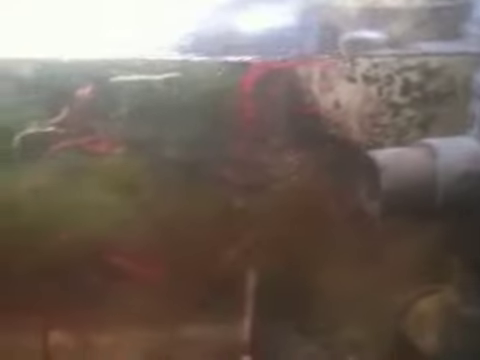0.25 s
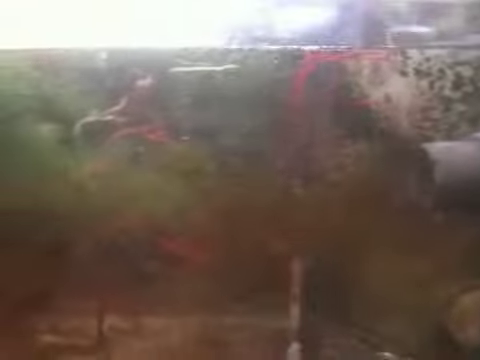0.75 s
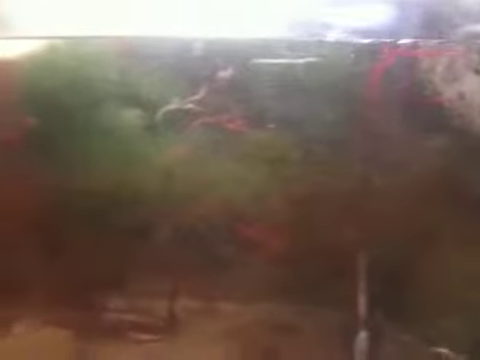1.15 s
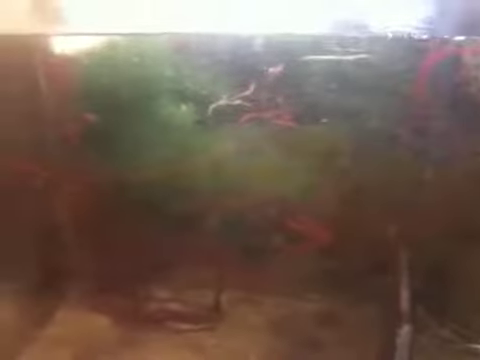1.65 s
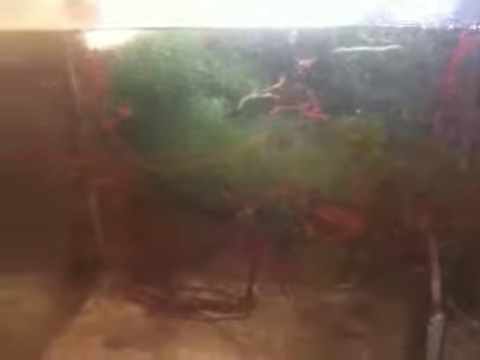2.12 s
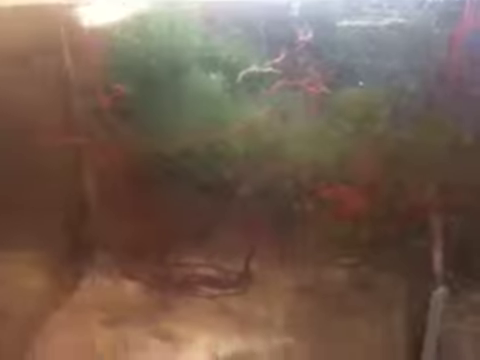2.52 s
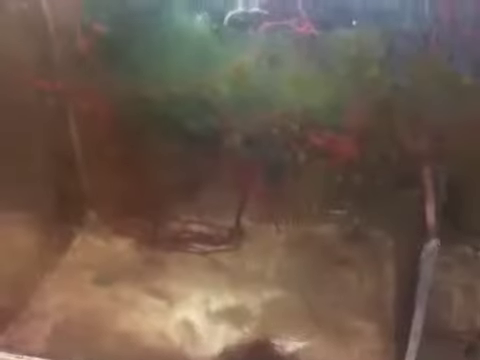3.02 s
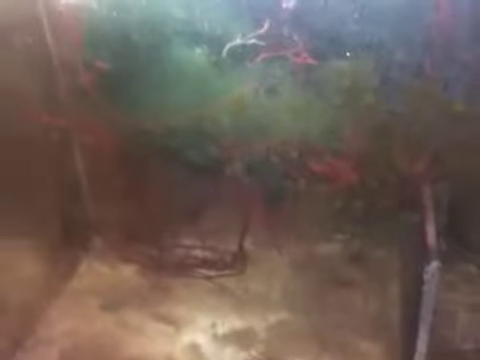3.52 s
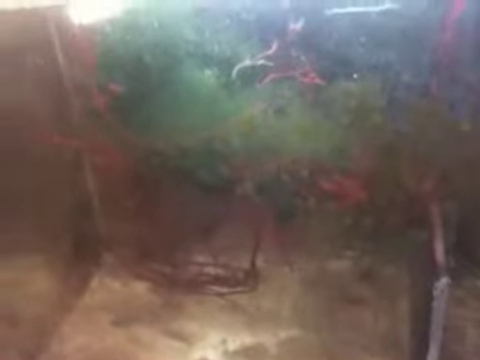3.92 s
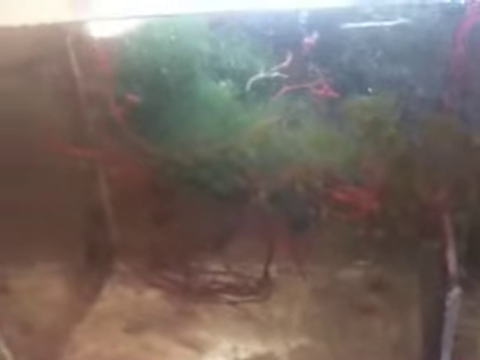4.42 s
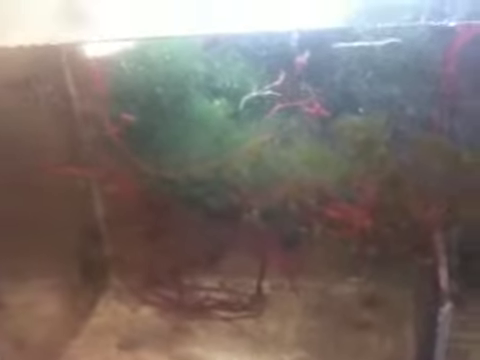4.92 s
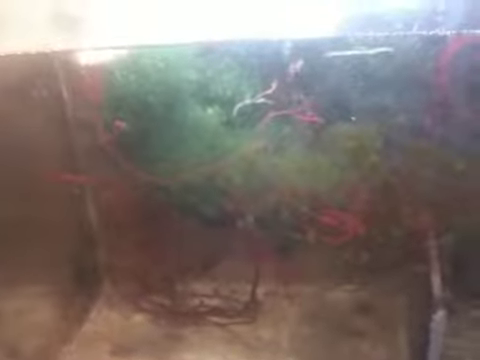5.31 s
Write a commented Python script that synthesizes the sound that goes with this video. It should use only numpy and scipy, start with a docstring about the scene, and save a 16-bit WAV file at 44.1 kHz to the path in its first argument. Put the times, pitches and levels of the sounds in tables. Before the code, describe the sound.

Inside the cabinet under an aquarium, water runs steadily down a drain pipe into the sump, with a hollow, resonant churn. An electric pump hums low beneath it throughout. Small bubbles gurgle, air gulps softly in the pipe and tiny droplets spit at irregular moments. The close microphone starts beside the pipe and shifts to the front of the sump after about a second, slightly changing the water's tone.

```python
"""Aquarium sump, close up

Inside the cabinet under a tank, a mains-driven pump hums while water runs down a drain pipe into
the sump. The flow rings the pipe and the cabinet, air gulps, bubbles gurgle and droplets spit, all
blurred by the close walls. The microphone starts beside the pipe and, after about a second, moves
toward the front of the sump."""
import sys
import numpy as np
from scipy import signal
from scipy.fft import rfft, irfft
from scipy.io import wavfile

SR = 44100
rng = np.random.default_rng(int(sys.argv[2]) if len(sys.argv) > 2 else 0)


def store_pcm(level_fs):
    """Save levels as 16-bit WAV."""
    pcm = np.round(np.clip(level_fs, -1, 1) * 32767).astype(np.int16)
    wavfile.write(sys.argv[1], SR, np.atleast_2d(pcm).T)


N = 244736
TIME = np.arange(N) / SR
BIN_HZ = np.maximum(np.fft.rfftfreq(N, 1 / SR), 1)
MAINS_HZ = 60.022

# Microphone path: time_s, position (0 beside the pipe, 1 in front of the sump)
MIC_PATH = [(0, 0.088), (1.05, 0.17), (1.55, 0.77), (5.55, 0.68)]
# Levels in the tables are relative: each source applies its own gain afterwards.
# Partials of the pump hum: mains_multiple, level_db
HUM_PARTIALS = [(2, -50.5), (3, -38), (4, -64.5), (5, -59.5), (6, -69.5), (8, -58), (10, -70), (12, -71),
                (15, -70.5), (17, -74.5), (18, -70.5), (20, -80)]
# Low gulps of air in the drain pipe: time_s, level_db
AIR_GULPS = [(.767, -53), (1.097, -56), (1.569, -53), (2.407, -49), (2.632, -51), (3.358, -55),
             (3.805, -50), (4.537, -50), (5.178, -49)]
# The loudest droplets: start_s, pitch_hz, ring_db, spit_db
LOUD_DROPLETS = [(0.572, 5900, -53, -41), (1.08, 9700, -59.5, -50), (1.332, 8500, -61, -57),
                 (1.448, 7460, -55, -69), (1.576, 7000, -57.5, -50), (2.06, 8200, -57.5, -62),
                 (2.341, 13000, -61, -51), (3.167, 9650, -62, -53), (3.423, 6700, -58, -59),
                 (3.832, 13000, -67, -50), (3.899, 6300, -54.5, -51), (4.225, 7000, -61, -51),
                 (4.536, 5130, -57.5, -48), (4.883, 5200, -57.5, -48), (5.13, 9400, -57, -59)]
# The loudest bubbles: start_s, pitch_hz, level_db
LOUD_BUBBLES = [(0.291, 4350, -55.5), (0.393, 3100, -55.5), (0.531, 2580, -54.5), (0.531, 1574, -50.5),
                (.567, 610, -48), (0.82, 3190, -55.5), (0.825, 1620, -52), (1.035, 1420, -49.5),
                (1.134, 1350, -54), (1.219, 3080, -56.5), (1.329, 4400, -57.5), (1.574, 2720, -57.5),
                (1.679, 1550, -48), (2.162, 3220, -56), (2.448, 4390, -57.5), (2.671, 1480, -49),
                (2.818, 1560, -52), (2.888, 1554, -52), (3.126, 1540, -51), (3.181, 1543, -52),
                (3.776, 1530, -51.5), (4.215, 3370, -55), (5.049, 3080, -54.5), (5.205, 2200, -52),
                (5.386, 2800, -53)]
# Colour of the running water: frequency_hz, gain_db
FLOW_COLOUR = [(25, -32), (60, -29), (90, -20), (135, -1), (190, 3.5), (235, -12.5), (560, -5),
               (820, -14.5), (1300, -15.5), (2100, -19.5), (4000, -25.5), (7500, -24.5), (11000, -33),
               (16000, -32)]
# Resonances of pipe and cabinet: centre_hz, width_hz, lift_at_pipe_db, lift_at_sump_db
RESONANCES = [(285, 80, 13.5, 12.5), (365, 29, -6, -5), (424, 82, 4, 4), (693, 36, 6.5, 0),
              (1035, 122, 9, 9), (1163, 18, 10, 5.5), (1336, 106, 5.5, 2.5), (1519, 60, -0.5, 10.5),
              (1610, 36, 10.5, 6.5), (2243, 20, 9.5, 5.5), (2454, 41, 8.5, 3.5), (2747, 180, 8.5, 6),
              (3020, 220, 4.5, -1.5), (3240, 43, 9, 7), (3810, 43, 6, 9.5), (4280, 110, 3.5, 3),
              (4920, 590, 3.5, 2), (6460, 310, 2, 2.5), (7040, 390, 5, 3.5)]


def undb(db):
    """Decibels to gain."""
    return 10 ** (np.asarray(db) / 20)


def unit_rms(x):
    """Scale to rms 1."""
    return x / np.sqrt(np.mean(x ** 2))


def noise(response):
    """White noise shaped by one gain per frequency bin."""
    return irfft(rfft(rng.standard_normal(N)) * response, N)


def wander(rate_hz):
    """Smooth random drift of rms 1, mostly slower than rate_hz."""
    return unit_rms(noise(np.exp(-(BIN_HZ / rate_hz) ** 2)))


def add(out, start_s, sound):
    """Mix a sound into out at start_s."""
    i = min(max(int(start_s * SR), 0), N)
    out[i:i + len(sound)] += sound[:N - i]


def scattered(low_hz, high_hz, db, spread_db, count):
    """Small events at loose intervals, as rows of start_s, pitch_hz, level_db."""
    when, pitch, strength = rng.random((count, 3)).T
    start_s = (np.arange(count) + when) * N / SR / count
    pitch_hz = low_hz * (high_hz / low_hz) ** pitch
    return list(zip(start_s, pitch_hz, db + spread_db * (2 * strength - 1)))


def mic_position():
    """Where the microphone is at each sample, between pipe (0) and sump (1)."""
    return np.interp(TIME, *np.transpose(MIC_PATH))


def wall_echoes(t60_s, build_s=0.0032, samples=5000):
    """Dense echoes between close glass and cabinet walls build up quickly and die away."""
    t = TIME[:samples]
    return rng.standard_normal(samples) * (1 - np.exp(-t / build_s)) * undb(-60 * t / t60_s)


def standing_waves(echo_db=-7.5, t60_s=0.22, corner_hz=1400):
    """Direct sound plus wall echoes at one spot: fine peaks and notches, mostly in the treble."""
    echoes = wall_echoes(t60_s)
    reflected = rfft(echoes / np.linalg.norm(echoes), N)
    response = 1 + undb(echo_db) * reflected * BIN_HZ / np.hypot(BIN_HZ, corner_hz)
    return response / np.sqrt(np.mean(np.abs(response) ** 2))


def pump_hum():
    """Mains-locked hum; the upper partials waver with the load on the impeller."""
    phase = 2 * np.pi * MAINS_HZ * TIME + 0.004 * wander(10)
    hum = 0
    for multiple, db in HUM_PARTIALS:
        waver_db = 0.055 * multiple * wander(6.6)
        hum += undb(db + waver_db) * np.cos(multiple * phase)
    return hum * undb(0.9 * (1 + mic_position()))  # a touch louder toward the sump


def gulps(pipe_hz=292, gain_db=3, swell_s=0.013, lead_s=0.007):
    """Swallowed air briefly swells the lowest resonance of the drain pipe."""
    out, t = np.zeros(N), TIME[:8000]
    swell = (t / swell_s) ** 2 * np.exp(2 * (1 - t / swell_s))
    for time_s, db in AIR_GULPS:
        detune, phase = rng.uniform(-0.95, 1, 2)
        hz = pipe_hz * (1 + 0.056 * detune)
        tone = np.sin(2 * np.pi * hz * t + np.pi * phase)
        add(out, time_s - lead_s, undb(db + gain_db) * swell * tone)
    return out


def bubble(hz, cycles, t60_s, rise=0.035, samples=5000):
    """A bubble rings for some cycles, rising in pitch, and the walls prolong it."""
    fade = np.exp(-TIME[:samples] * hz / cycles)
    pitch_hz = hz * (1 + rise * (1 - fade) - rise / 2)
    ring = fade * np.sin(2 * np.pi * np.cumsum(pitch_hz) / SR)
    heard = signal.fftconvolve(ring, wall_echoes(t60_s))[:samples]
    return heard / np.std(heard[:samples // 8])  # rms 1 at the start


def droplets(ring_gain_db=-3, spit_gain_db=0.5, low_cut_hz=4500):
    """Each droplet spits a bright tick and rings a tiny bubble; fine spray falls among the loud ones."""
    rings, spits = np.zeros(N), np.zeros(N)
    spray = scattered(low_hz=8050, high_hz=14000, db=-65.5, spread_db=2, count=14)
    spray = [(start_s, hz, db, db + 5) for start_s, hz, db in spray]  # more spit than ring
    for start_s, hz, ring_db, spit_db in LOUD_DROPLETS + spray:
        add(rings, start_s, undb(ring_db + ring_gain_db) * bubble(hz, cycles=2.3, t60_s=0.045))
        add(spits, start_s, undb(spit_db + spit_gain_db) * wall_echoes(t60_s=0.053, build_s=0.0045))
    low_cut = signal.butter(2, low_cut_hz, "high", fs=SR, output="sos")
    return rings + signal.sosfilt(low_cut, spits)


def gurgles(gain_db=-5, pipe_hz=1520, pipe_width_hz=150):
    """Loud bubbles stand out, fainter ones trickle between; those in tune with the pipe ring longer."""
    out = np.zeros(N)
    trickle = scattered(low_hz=2680, high_hz=4400, db=-59.5, spread_db=1.5, count=9)
    burble = scattered(low_hz=1512, high_hz=1583, db=-58, spread_db=2, count=22)
    for start_s, hz, db in LOUD_BUBBLES + trickle + burble:
        in_tune = np.exp(-((hz - pipe_hz) / pipe_width_hz) ** 2)
        add(out, start_s, undb(db + gain_db) * bubble(hz, cycles=4 + 8 * in_tune, t60_s=0.078))
    return out


def splashing(surge_db=0.5, surge_hz=4.8, ring_to_gush_db=50.5, settle_s=0.015):
    """Splash strength as a gain around 1: the stream surges, and each loud droplet stirs up a gush."""
    gushes = np.zeros(N)
    settle = np.exp(-TIME[:8000] / settle_s)
    for start_s, _, ring_db, _ in LOUD_DROPLETS:
        add(gushes, start_s, undb(ring_db + ring_to_gush_db) * settle)
    return unit_rms(undb(surge_db * wander(surge_hz)) * (1 + gushes))


def froth(splash, low_hz=1400, high_hz=13000, spread_db=2.5, gain_db=-53, count=750):
    """A swarm of small bubbles of many sizes where the stream enters the sump."""
    out = np.zeros(N)
    for when, pitch, strength in rng.random((count, 3)):
        hz = low_hz * (high_hz / low_hz) ** pitch
        db = spread_db * min(-np.log(1 - strength), 2.3)  # many faint, a few strong
        gain = undb(db) * np.sqrt(hz)  # smaller bubbles spread their sound over a wider band
        add(out, when * N / SR, gain * bubble(hz, cycles=5.4, t60_s=0.064))
    return unit_rms(out) * splash * undb(gain_db)


def drain(splash, churn_gain_db=-45, fizz_gain_db=-46, split_hz=1900):
    """Water churns in the pipe, throbbing with the pump; higher in pitch, the surface fizzes."""
    low_band = 1 / np.sqrt(1 + (BIN_HZ / split_hz) ** 4)
    high_band = np.sqrt(1 - low_band ** 2)
    throb = 1 + 0.07 * np.cos(2 * np.pi * MAINS_HZ * TIME)
    churn = noise(low_band) * throb * undb(churn_gain_db + 1.37 * wander(25))
    fizz = noise(high_band) * splash * undb(fizz_gain_db + 1.63 * wander(38))
    return churn + fizz


def running_water(gain_db=10.5):
    """The flow rings pipe and cabinet; their resonances change in strength as the microphone moves."""
    splash = splashing()
    flow = rfft(drain(splash) + froth(splash))
    hz, db = np.transpose(FLOW_COLOUR)
    colour_db = np.interp(np.log(BIN_HZ), np.log(hz), db)
    lifts_db = 0
    for centre_hz, width_hz, *peaks_db in RESONANCES:
        bell = np.exp(-2 * ((BIN_HZ - centre_hz) / width_hz) ** 2)
        lifts_db += np.outer(peaks_db, bell)
    at_pipe, at_sump = (irfft(flow * undb(colour_db + lift) * standing_waves(), N) for lift in lifts_db)
    crossfade = np.pi / 2 * mic_position()
    return undb(gain_db) * (np.cos(crossfade) ** 1.8 * at_pipe + np.sin(crossfade) ** 1.8 * at_sump)


def scene():
    """One close microphone hears the pump, the running water and its gulps, bubbles and droplets."""
    water = running_water()
    return (pump_hum() + water + gulps() + gurgles() + droplets())[None]


def record(dry):
    """The recorder cuts the treble steeply above 15.8 kHz."""
    high_cut = signal.ellip(12, 0.1, 80, 15800, fs=SR, output="sos")
    return signal.sosfilt(high_cut, dry)


dry = scene()
out = record(dry)
store_pcm(out)
```